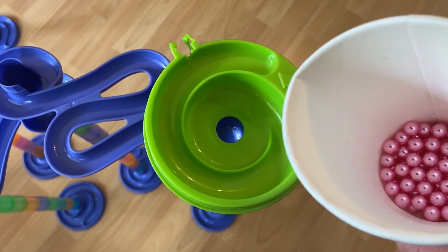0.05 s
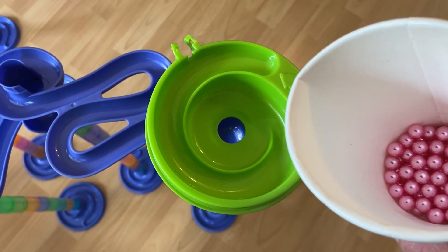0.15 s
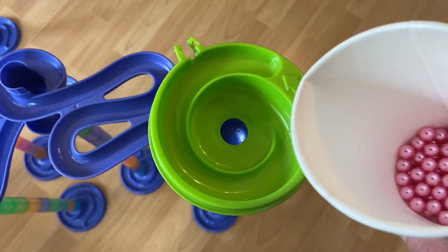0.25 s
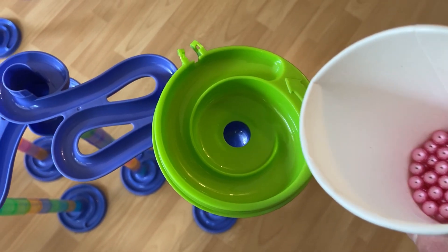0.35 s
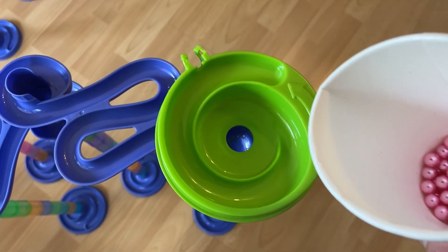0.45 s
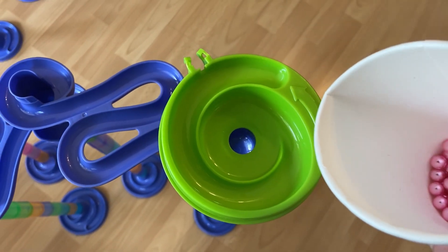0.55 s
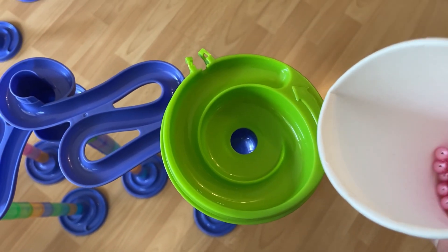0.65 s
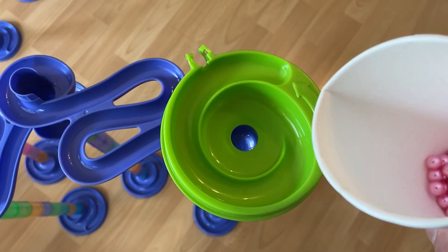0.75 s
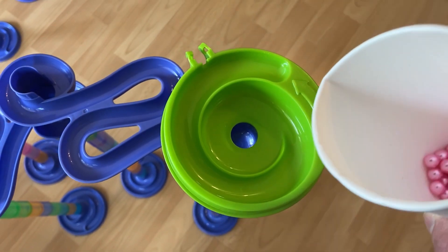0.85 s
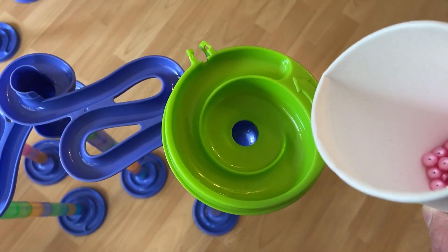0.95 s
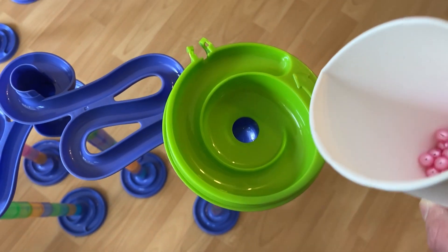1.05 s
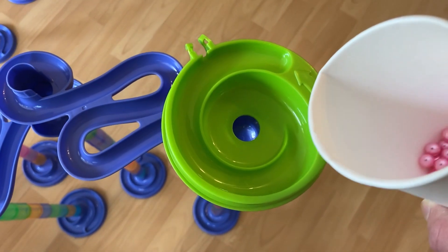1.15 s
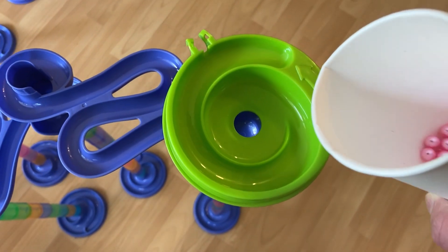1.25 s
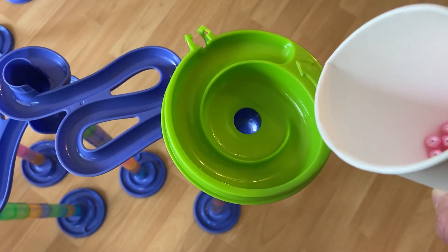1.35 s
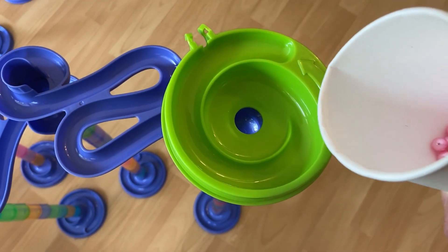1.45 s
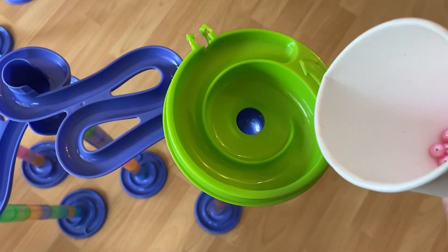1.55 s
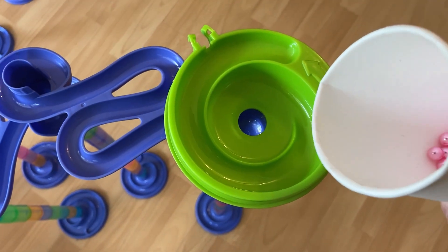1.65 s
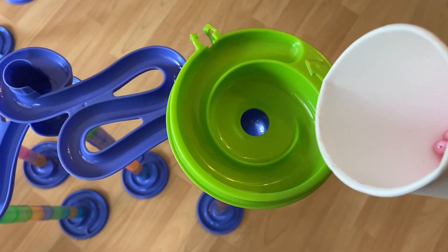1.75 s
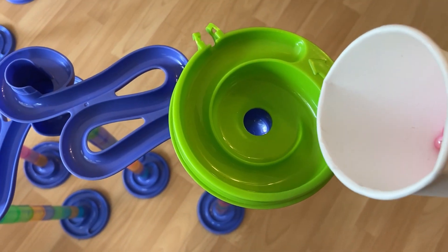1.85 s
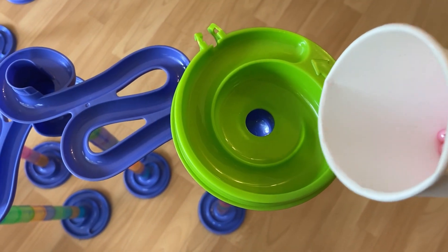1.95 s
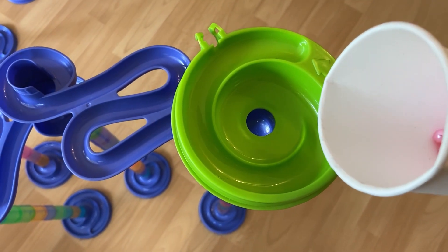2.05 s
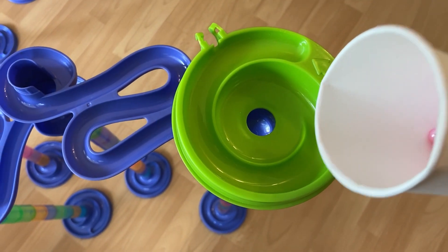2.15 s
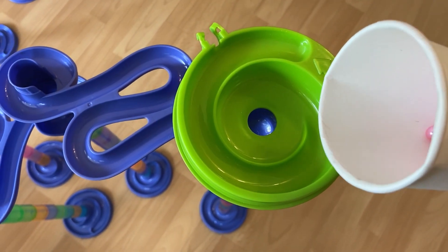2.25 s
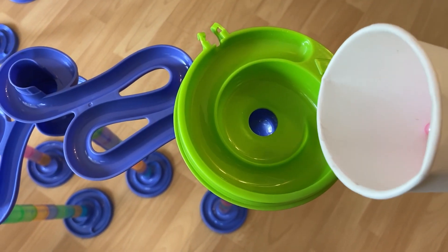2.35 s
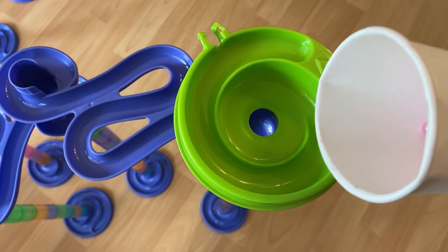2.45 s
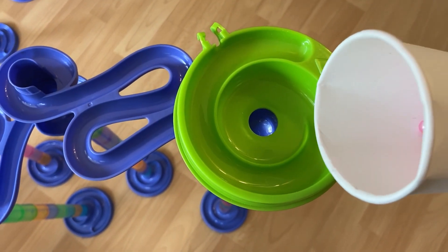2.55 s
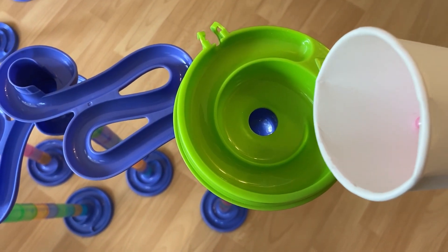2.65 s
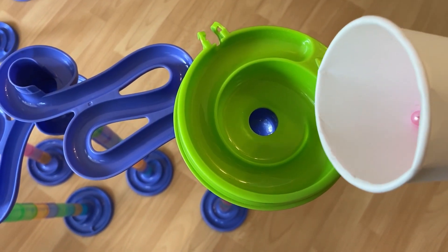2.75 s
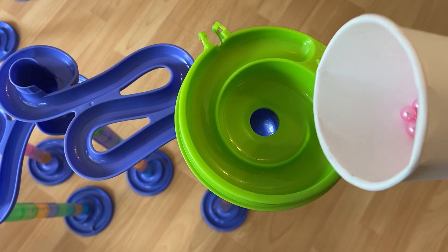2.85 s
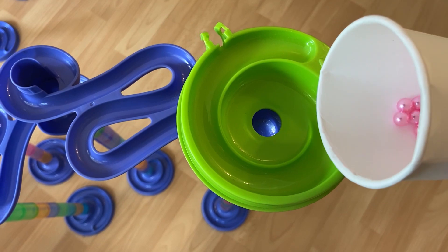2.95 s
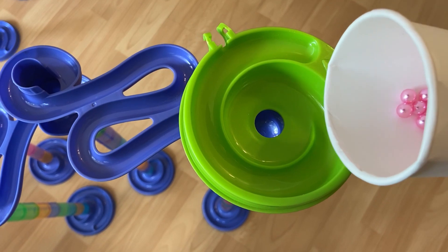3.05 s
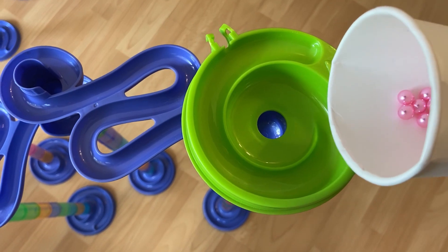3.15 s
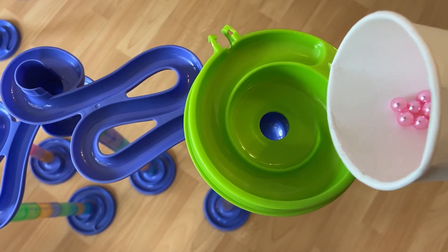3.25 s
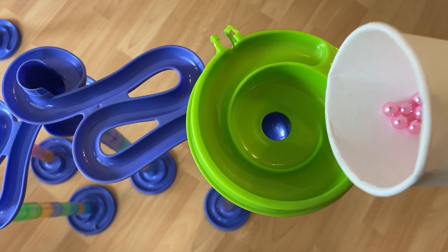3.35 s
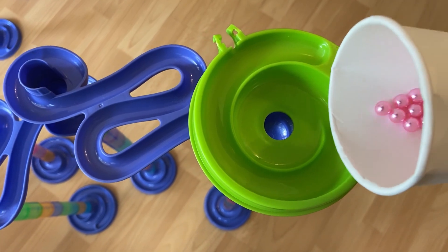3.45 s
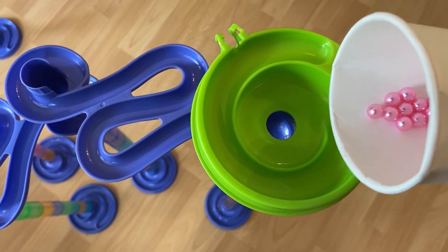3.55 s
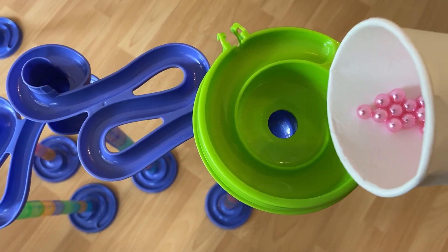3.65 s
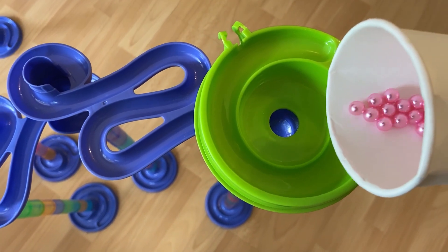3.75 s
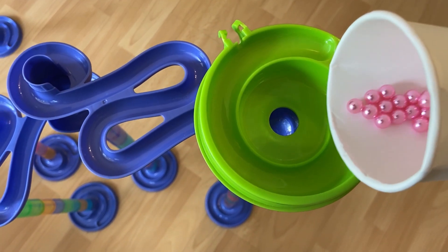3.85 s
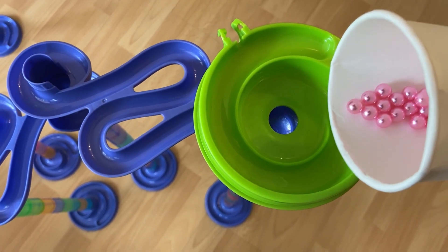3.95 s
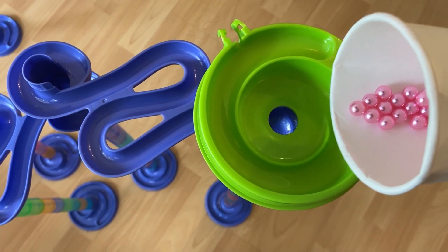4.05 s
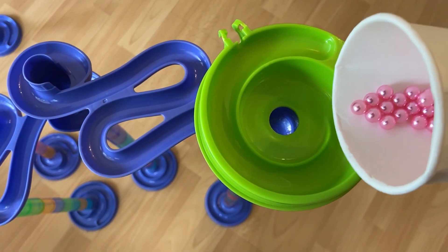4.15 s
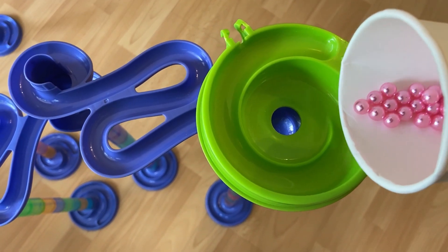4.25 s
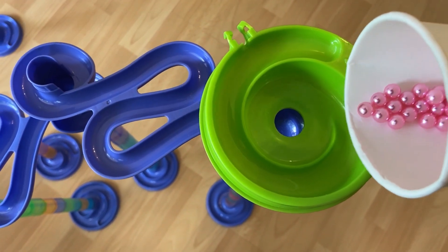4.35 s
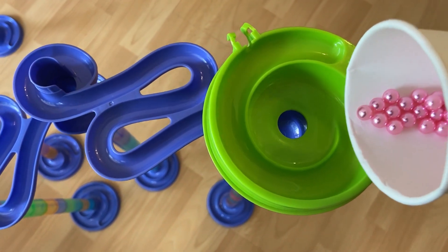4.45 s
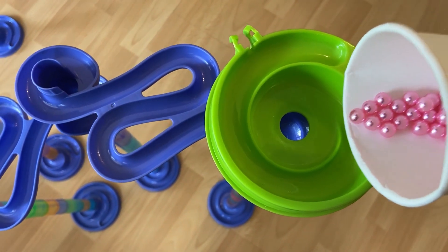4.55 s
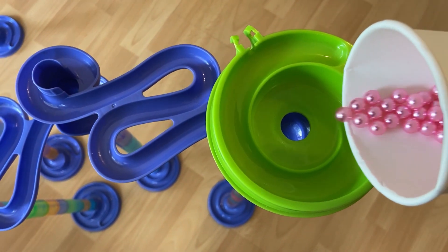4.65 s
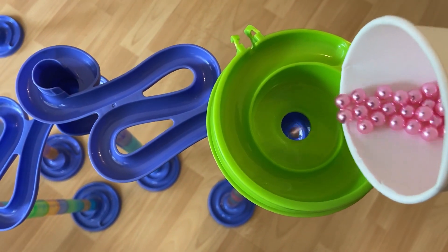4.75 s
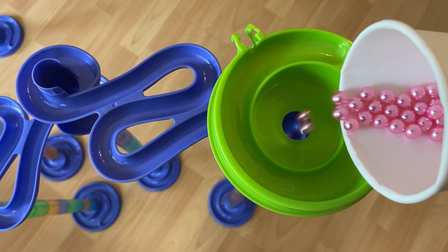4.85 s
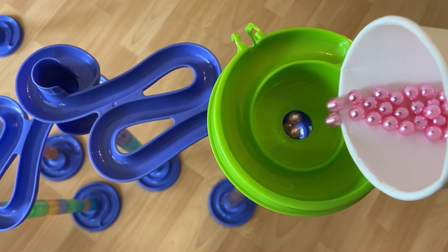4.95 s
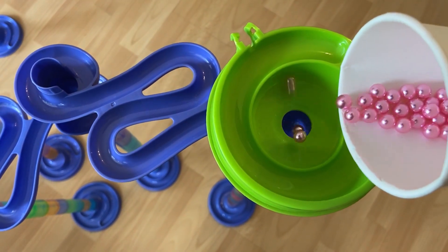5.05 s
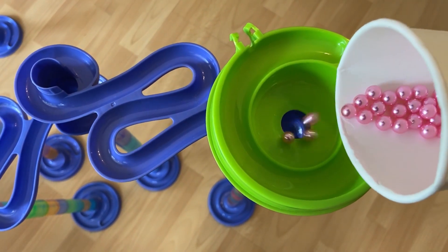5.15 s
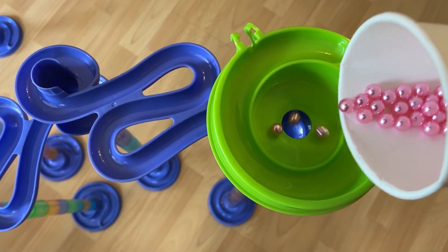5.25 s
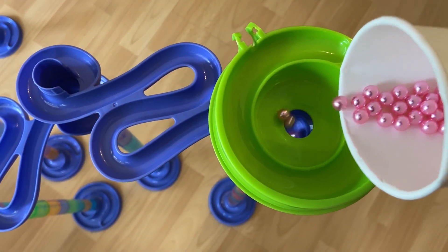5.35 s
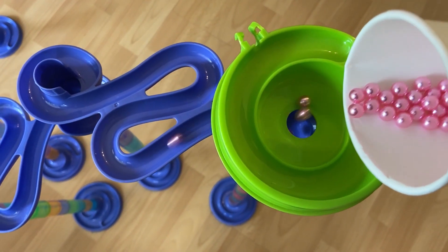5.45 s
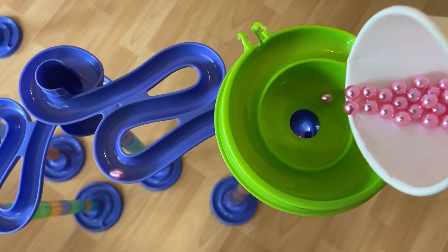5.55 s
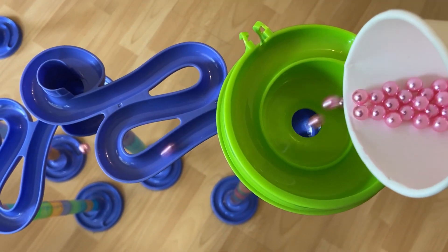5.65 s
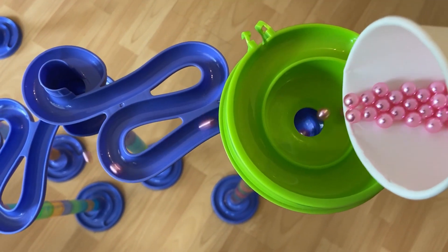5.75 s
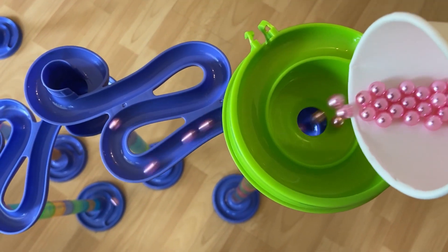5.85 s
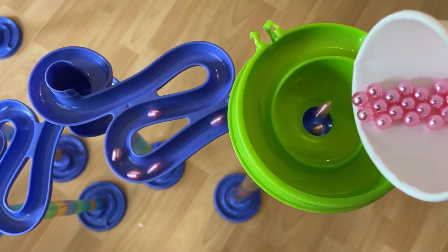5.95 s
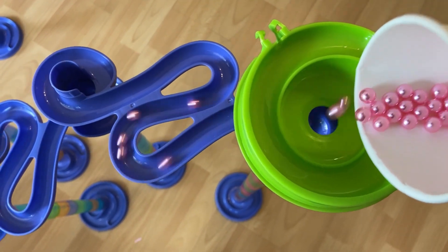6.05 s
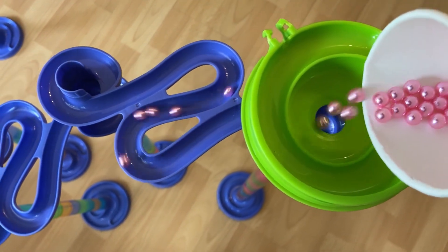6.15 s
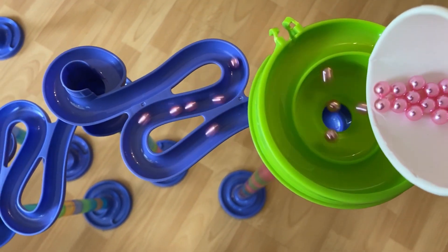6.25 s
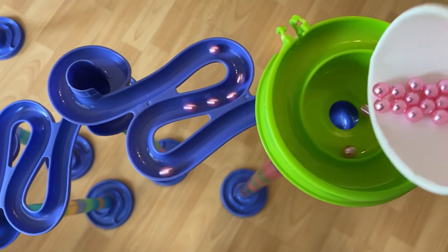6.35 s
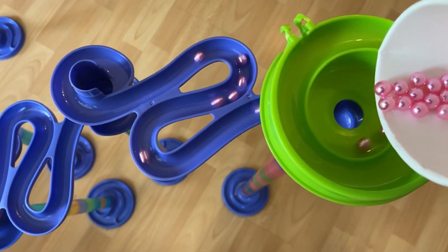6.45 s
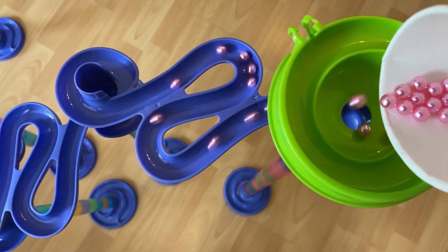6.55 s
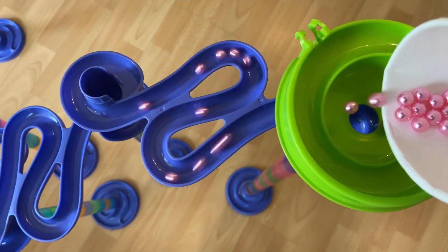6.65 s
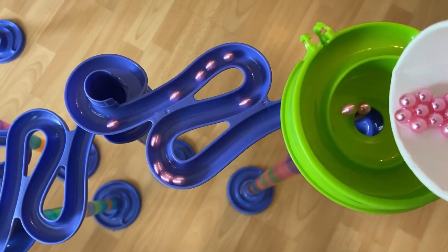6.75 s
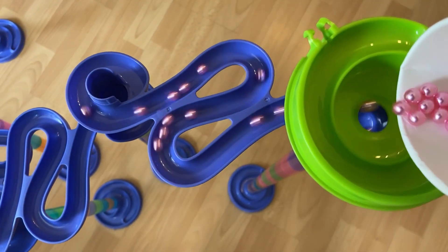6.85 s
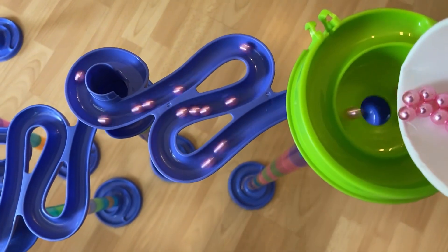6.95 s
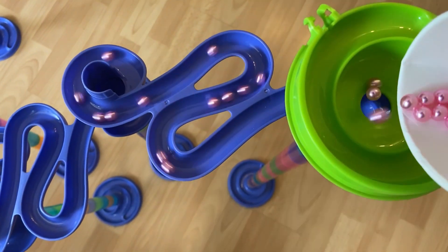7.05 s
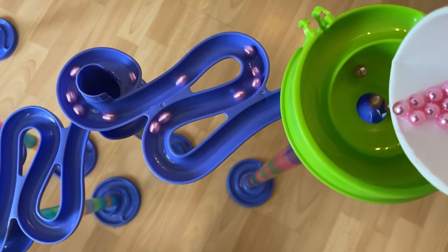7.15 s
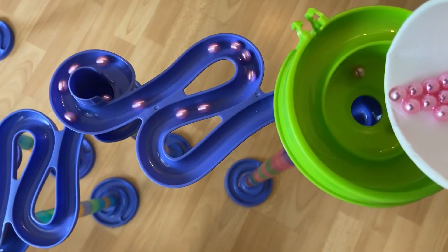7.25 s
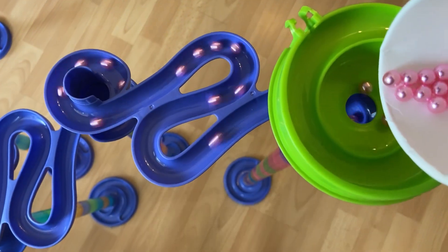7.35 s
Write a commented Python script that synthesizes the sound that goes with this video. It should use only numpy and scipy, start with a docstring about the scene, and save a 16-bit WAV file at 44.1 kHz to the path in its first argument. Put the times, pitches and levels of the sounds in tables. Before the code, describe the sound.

Close up, a heap of light plastic beads slides inside a tilting paper cup, clicking together and drumming softly on its thin wall in uneven bursts. After about five seconds they spill into a plastic funnel, bouncing with bright ticks, then roll down hollow tracks in a louder, continuous clatter. The cup rim bumps the funnel a few times. Quiet small room, close stereo microphone.

```python
"""Plastic beads in a paper cup and on a marble run

Light beads shuffle in a tilted paper cup close to a stereo microphone and knock its thin, modal wall.
From 4.9 s they drop into the plastic funnel of a marble run, bounce and rattle down its tracks.
Contacts are impulses with scattered, coloured shell noise; the cup's rim bumps the funnel three times.
Diffuse noise tails answer as a small room, over faint room noise and a brief rumble of handling."""
import sys
import numpy as np
from scipy import signal
from scipy.fft import rfft, irfft, next_fast_len
from scipy.io import wavfile

SR = 44100
rng = np.random.default_rng(int(sys.argv[2]) if len(sys.argv) > 2 else 0)


def materialize(psi):
    """Save the field psi as 16-bit PCM at rate SR to the path in sys.argv[1].

    A 1-D psi becomes a single channel; in a 2-D psi each row is a channel.
    """
    bounded = np.clip(np.atleast_2d(psi).T, -1, 1)
    quanta = np.round(bounded * 32767).astype(np.int16)
    wavfile.write(sys.argv[1], SR, quanta)


N = 325899
HIT_SAMPLES = 4096  # length of one contact
LEVEL_WINDOW_S = 0.005  # a hit of 0 dB has the energy of rms 1 over this time

# Strongest bead knocks in the cup. Each row: time in seconds, bead click in dB, cup wall in dB.
CUP_KNOCKS = [(.3418, -54, -66), (.3809, -58, -71), (.4687, -52.5, -68), (.4939, -45.5, -48),
              (0.6136, -61, -68), (0.6516, -45, -59), (.6673, -27, -36.5), (.7085, -25, -35),
              (.7377, -31, -36), (0.7588, -27.5, -48), (0.768, -27.5, -31.5), (.8182, -25.5, -30.5),
              (.8363, -21, -35), (.8599, -30.5, -28.5), (.8859, -24.5, -40), (.9215, -29.5, -30.5),
              (0.9389, -32, -47), (.9796, -31, -44), (1.014, -32, -34), (1.0876, -29.5, -35),
              (1.0913, -28, -48), (1.101, -30, -31), (1.114, -30, -43), (1.1478, -31, -41),
              (1.1636, -26, -27), (1.1796, -26.5, -51), (1.2658, -30, -39), (1.3147, -30, -29.5),
              (1.3385, -23, -25), (1.3607, -28, -48), (1.3958, -26.5, -26.5), (1.4996, -29.5, -32),
              (1.5161, -28.5, -31), (1.5924, -43, -41), (1.6476, -38, -42.5), (1.8018, -34.5, -53),
              (1.8195, -50, -39), (1.8333, -25, -26), (1.8723, -33.5, -36), (1.953, -33, -36.5),
              (1.9815, -36, -31), (2.0517, -29, -34.5), (2.0861, -26.5, -24.5), (2.164, -44.5, -62),
              (2.3108, -42, -46), (2.3373, -31.5, -38.5), (2.5172, -35, -30), (2.5421, -37.5, -30.5),
              (2.5663, -52, -39), (2.7163, -29.5, -41), (2.7978, -28, -49), (2.8086, -24, -24),
              (2.8217, -28.5, -29), (2.8459, -27, -25.5), (2.9095, -23, -19), (2.9316, -27, -28),
              (2.9764, -29, -48), (3.018, -53, -30.5), (3.0573, -35, -30), (3.0956, -27, -35.5),
              (3.1402, -33, -29.5), (3.1847, -35.5, -33.5), (3.2077, -41, -33), (3.2998, -35, -42),
              (3.4239, -35, -39.5), (3.448, -34, -36.5), (3.5131, -31, -27), (3.6656, -28, -31.5),
              (3.6887, -39, -30), (3.8036, -32.5, -50), (3.8395, -34.5, -34), (3.8808, -26.5, -48),
              (3.8878, -35, -28.5), (3.9086, -37.5, -44), (4.2419, -29.5, -42), (4.2946, -40.5, -46),
              (4.3379, -42.5, -61), (4.4232, -29, -47.5), (4.4624, -39.5, -49.5), (4.6573, -32, -34),
              (4.6646, -33, -25), (4.6899, -28, -31), (4.7057, -49, -29), (4.7184, -32, -35),
              (4.7668, -33, -49), (4.7977, -35, -38.5), (4.8299, -33, -38.5), (4.8774, -27.5, -30),
              (4.899, -29, -30), (4.954, -23.5, -33), (5.663, -52, -34), (5.758, -41, -27),
              (5.865, -28.5, -33), (6.069, -28, -34), (6.735, -48, -33.5)]
# Strongest bounces on the run. Each row: time in seconds, hollow ring, plastic clack, hard tick in dB.
RUN_BOUNCES = [(4.903, -22, -23.5, -20), (4.919, -26, -25, -23), (4.9557, -36, -31, -27),
               (4.9778, -34, -37, -26), (5.015, -22.5, -22, -19), (5.0204, -22, -18.5, -16),
               (5.08, -26, -17.5, -26), (5.1048, -23, -24, -21), (5.113, -24.5, -21, -16.5),
               (5.1275, -44, -23, -31), (5.1474, -22, -20, -16.5), (5.1544, -30, -19.5, -24),
               (5.1698, -53, -27, -26), (5.1867, -26, -21, -19), (5.2274, -28, -27, -29),
               (5.2334, -32, -21, -24), (5.2751, -27.5, -20.5, -23.5), (5.2972, -32, -29, -29),
               (5.3326, -25, -20, -18.5), (5.344, -33, -21.5, -28), (5.3921, -32, -33.5, -36),
               (5.4738, -26.5, -25, -28.5), (5.505, -47, -31.5, -35), (5.5337, -25, -25.5, -21.5),
               (5.544, -28, -29, -42), (5.6107, -23.5, -22.5, -19), (5.6306, -28, -17, -23),
               (5.6468, -42, -24, -27), (5.6644, -32, -29, -23.5), (5.7249, -29, -33, -32.5),
               (5.8072, -28, -14, -22.5), (5.8232, -32, -21, -24), (5.8445, -34, -16, -22),
               (5.8661, -32, -19.5, -22), (5.9729, -42, -21, -25), (6.0077, -48, -23.5, -31.5),
               (6.0583, -30, -14.5, -21.5), (6.0701, -27, -27, -20), (6.088, -32, -23.5, -27.5),
               (6.1356, -27, -20.5, -17.5), (6.156, -38, -22.5, -34), (6.1742, -36, -26, -29),
               (6.2239, -32, -16, -23.5), (6.333, -26, -16.5, -21), (6.346, -35, -18, -22),
               (6.3879, -32.5, -37, -28), (6.4079, -38, -15.5, -31), (6.4215, -25, -24, -31),
               (6.428, -46, -25.5, -28), (6.4534, -30, -24.5, -31), (6.4688, -25, -26.5, -33),
               (6.477, -31.5, -29, -33), (6.5094, -40, -25.5, -38), (6.5143, -36, -25.5, -32),
               (6.529, -30.5, -23, -31.5), (6.568, -30.5, -29, -37), (6.592, -28, -34.5, -54),
               (6.6935, -23.5, -18.5, -23), (6.74, -31, -30, -24), (6.75, -46, -27, -18.5),
               (6.8003, -36, -19, -23.5), (6.825, -20.5, -19.5, -22), (6.8685, -32, -27, -30),
               (6.9086, -33, -31, -42), (6.9244, -39, -26, -29), (6.9439, -34, -20.5, -27),
               (6.9671, -35, -28, -20), (7.021, -32, -24.5, -26.5), (7.0567, -20.5, -18.5, -20.5),
               (7.0779, -32, -17, -32), (7.1042, -37, -26, -35), (7.1676, -48, -28.5, -32),
               (7.1977, -24, -30, -39), (7.2276, -29, -28, -18), (7.2464, -29.5, -22.5, -30),
               (7.2618, -33, -38, -20.5), (7.3038, -33, -24.5, -21), (7.3478, -30.5, -35, -23.5)]
# Share of the heap that lies on the cup's side wall. Each row: time in seconds, share from 0 to 1.
HEAP_ON_SIDE = [(2.5, 0.18), (2.85, 0.53), (3.7, 0.56), (4.65, 0.62)]
# Colour of a bead click in the cup. Each row: frequency in Hz, relative level in dB per Hz.
CLICK_COLOUR = [(100, -38), (400, -24.5), (1000, -11), (1750, -8.5), (2160, 10.5), (2700, -6.5), (3700, -4),
                (5000, -11), (7000, -5), (9000, -16), (12500, -12.5), (16000, -37)]
# Colour of a tiny hard tick. Each row: frequency in Hz, relative level in dB per Hz.
TICK_COLOUR = [(1000, -50), (5200, -12), (7000, 5.5), (8200, 6.5), (9200, 5.5), (10700, -0.5), (12500, 2.5),
               (14000, -1.5), (16000, -22)]


def amp(db):
    """Decibels to gain."""
    return 10 ** (np.asarray(db) / 20)


def unit(x):
    """Scaled to rms 1."""
    return x / np.sqrt(np.mean(x ** 2) + 1e-20)


def along(points, hz):
    """Value at hz, interpolated between (Hz, value) points on a log axis."""
    f, v = np.transpose(points)
    return np.interp(np.log(hz + 1), np.log(f + 1), v)


def curve(rows, seconds):
    """(Seconds, value) rows interpolated at the given times."""
    return np.interp(seconds, *np.transpose(rows))


def filtered(x, response):
    """x times a response of frequency."""
    size = next_fast_len(N + SR // 2)
    return irfft(rfft(x, size) * response(np.fft.rfftfreq(size, 1 / SR)), size)[..., :N]


def causal(gain_db):
    """Minimum-phase responses with the given gains: they ring only after the blow."""
    cepstrum = irfft(np.log(amp(gain_db)))
    cepstrum[..., 1:HIT_SAMPLES // 2] *= 2
    cepstrum[..., HIT_SAMPLES // 2 + 1:] = 0
    return np.exp(rfft(cepstrum))


def bursts(count, colour, t60, scatter, lag_ms, vary_db, travel_ms=0, apart=1.0):
    """Stereo contacts: a sharp impulse, then vibration scattered through the shell, each coloured anew."""
    t = np.arange(HIT_SAMPLES) / SR
    hz = np.fft.rfftfreq(HIT_SAMPLES, 1 / SR)
    fade = amp(-60 * t / t60) * (1 - np.exp(-t / 0.00079))
    # one noise common to both ports, plus one of its own for each
    noise = rng.standard_normal((count, 3, HIT_SAMPLES))
    shell = (noise[:, :1] + apart * noise[:, 1:]) * fade / np.linalg.norm(fade)
    scattered = 1 + scatter * rfft(shell * np.linspace(1, 0, HIT_SAMPLES))
    # each struck spot has its own uneven colour
    spots = np.geomspace(300, 16000, 24)
    ripple = np.array([np.interp(hz, spots, row) for row in rng.standard_normal((count, len(spots)))])
    body = causal(along(colour, hz) + vary_db * ripple)[:, None]
    # the left port lags the right one by lag_ms; a negative value delays the right port
    delay = np.maximum(np.reshape(lag_ms, (-1, 1, 1)) * np.array([[1], [-1]]), 0) / 1000
    # bending waves are slower at low pitch, so the treble arrives first
    bending = travel_ms * (2 * np.sqrt(hz / 1000) - hz / np.sqrt(1000 * SR / 2))
    return irfft(scattered * body * np.exp(-2j * np.pi * (hz * delay + bending)))


def place(times, levels_db, sounds):
    """Lay each stereo sound at its time and level."""
    out = np.zeros((2, N + 2 * HIT_SAMPLES))
    window_gain = np.sqrt(LEVEL_WINDOW_S * SR / HIT_SAMPLES)
    for seconds, db, sound in zip(times, levels_db, sounds):
        start = max(round(seconds * SR), 0)
        out[:, start:start + HIT_SAMPLES] += amp(db) * unit(sound) * window_gain
    return out[:, :N]


def patter(rate, spread_db, sounds):
    """Many small contacts of uneven size, rate a second, each playing one of the given sounds; rms 1."""
    out = np.zeros((2, N))
    for sound in sounds:
        at = rng.integers(0, N, int(rate * N / SR / len(sounds)))
        sizes = amp(spread_db * np.minimum(rng.standard_normal(len(at)), 2))
        contacts = np.bincount(at, sizes, N)[None]
        out += signal.oaconvolve(contacts, unit(sound), axes=1)[:, :N]
    return unit(out)


def chance_times(start, end, rate):
    """Unevenly spaced moments, rate a second."""
    count = int((end - start) * rate)
    return start + (np.arange(count) + rng.random(count)) / rate


def swell(start, length, attack, t60, sag_db_per_s=0):
    """Gain that rises, holds while sagging, and dies away."""
    t = np.arange(N) / SR - start
    sag_db = sag_db_per_s * np.clip(t, 0, length)
    decay_db = 60 * np.maximum(t - length, 0) / t60
    return np.clip(t / attack, 0, 1) * amp(-sag_db - decay_db)


def aftermath(times, levels_db, t60):
    """Power of the motion that blows leave behind; it adds up and dies away."""
    kicks = np.bincount(np.round(times * SR).astype(int), amp(levels_db) ** 2, N)[:N]
    return signal.lfilter([1], [1, -amp(-60 / (t60 * SR)) ** 2], kicks)


def background():
    """Faint room noise, and a brief low rumble of handling: both are filtered noise."""
    # Colour of the quiet room. Each row: frequency in Hz, relative level in dB per Hz.
    air_colour = [(15, -41), (25, -22), (66, -14.5), (163, -17.5), (286, -12.5), (335, -14), (709, -27),
                  (15000, -45)]
    rumble_colour = [(20, -15), (55, -2), (140, -27), (900, -76)]
    air = unit(filtered(rng.standard_normal((2, N)), lambda hz: amp(along(air_colour, hz))))
    rumble = unit(filtered(rng.standard_normal((2, N)), lambda hz: amp(along(rumble_colour, hz))))
    rumble_db = curve([(.1, -72), (.5, -92.5)], np.arange(N) / SR)
    return amp(-76.5) * air + amp(rumble_db) * rumble


def room(x, count=4):
    """Diffuse tails of decaying noise; the sound passes from one tail to the next every 40 ms."""
    # Reverberation of the small room. Each row: frequency in Hz, time to fall by 60 dB in seconds.
    decay_times = [(150, 0.54), (1000, 0.57), (5000, 0.21), (14000, 0.21)]
    colour = [(250, 7.5), (800, -2.5), (2000, 1.0), (6000, -1.5), (13000, -4.5)]
    wet = np.zeros((2, N))
    turn = np.arange(N) / SR / .04
    for k in range(count):
        hz, t, z = signal.stft(rng.standard_normal((2, SR * 3 // 4)), SR, nperseg=256)
        fade = amp(-60 * t / along(decay_times, hz)[:, None])
        tail = signal.istft(z * fade, SR, nperseg=256)[1]
        # the tail starts 3 ms after the direct sound
        tail = np.pad(tail / np.linalg.norm(tail[0]), ((0, 0), (round(.003 * SR), 0)))
        share = np.maximum(1 - abs((turn + k) % count - 1), 0)
        wet += signal.fftconvolve(x * share, tail, axes=1)[:, :N]
    return filtered(wet, lambda hz: amp(along(colour, hz)))


def bumps():
    """The rim pushes the whole tower: a low thud with a hollow after-ring; its loose joints buzz briefly."""
    # The cup's rim meets the funnel. Each row: time in seconds, thud in dB, shaken plastic in dB.
    rim_bumps = [(6.138, -27, -16.5), (6.752, -37, -20), (7.26, -44.5, -20.5)]
    # Colour of the thud. Each row: frequency in Hz, relative level in dB per Hz.
    thud_colour = [(80, -34), (180, -21), (250, 0), (400, -2.5), (600, 1), (850, -18), (2000, -62)]
    hollow = [(130, -20), (230, -12), (370, -2), (520, -13), (1200, -49)]
    buzz = [(300, -33), (1500, -15), (3000, -3), (6500, 1), (9000, -10), (12500, -0.5), (16000, -26)]
    s, thud_db, shake_db = np.transpose(rim_bumps)
    thuds = bursts(len(s), thud_colour, t60=0.018, scatter=0.68, lag_ms=0, vary_db=-0.5)
    after_rings = bursts(len(s), hollow, t60=0.46, scatter=4.6, lag_ms=0, vary_db=4.5)
    buzzes = bursts(len(s), buzz, t60=0.13, scatter=6.1, lag_ms=-0.12, vary_db=2.5)
    tower = place(s + 0.002, thud_db, thuds) + place(s + 0.00988, thud_db - 9, after_rings)
    # the thud is a little louder in the right port
    return tower * amp([[-2], [1.5]]) + place(s, shake_db, buzzes)


def rolling():
    """Rolling beads chatter finely on the track walls, more so after a bounce, and skip over the joints."""
    # Beads rolling on funnel and tracks. Each row: time in seconds, level in dB.
    roll_level = [(4.9, -37), (5.15, -34.5), (5.48, -40.5), (5.7, -39), (6.17, -36.5), (6.64, -44),
                  (6.87, -32.5), (7.05, -39.5), (7.39, -35)]
    # Colour of the fine chatter. Each row: frequency in Hz, relative level in dB per Hz.
    track_colour = [(50, -29), (120, -15), (220, -22), (480, -17), (720, -0.5), (1100, -3), (1500, 5.5),
                    (2500, -7.5), (4000, -1.5), (6800, 3.5), (9000, -7.5), (12500, -16.5), (16000, -38)]
    # Colour of a light skip on the track. Each row: frequency in Hz, relative level in dB per Hz.
    skip_colour = [(200, -28), (900, -19), (1500, 2), (2500, 3.5), (4000, 0), (7000, 4.5), (9000, -6.5),
                   (13000, -14.5), (16000, -28)]
    start_s, attack_s = 4.9, .05  # the first bead lands
    skid_db, skid_t60 = -15.5, 0.1  # chatter after a bounce, relative to its clack; decay in s
    skips_per_s, skip_db, skip_spread_db = 35, 3, 3  # lesser bounces, relative to the rolling
    lead_s, lead_db = .0033, -20  # mean lead of the faint tick; its level relative to the clack
    s, _, clack_db, _ = np.transpose(RUN_BOUNCES)
    t = np.arange(N) / SR
    steady = amp(curve(roll_level, t)) * np.clip((t - start_s) / attack_s, 0, 1)
    motion = np.sqrt(steady ** 2 + aftermath(s, clack_db + skid_db, skid_t60))
    taps = bursts(24, track_colour, t60=0.011, scatter=1.6, lag_ms=0, vary_db=4.5,
                  travel_ms=2.181, apart=2.1)
    chatter = patter(rate=480, spread_db=4.0, sounds=taps)
    at = chance_times(start_s + attack_s, N / SR, skips_per_s)
    skips = bursts(len(at), skip_colour, t60=0.0051, scatter=0.4, lag_ms=-0.077, vary_db=2.5,
                   travel_ms=1.8)
    skipping = place(at, skip_db + skip_spread_db * rng.standard_normal(len(at)), skips)
    # a faint soft tick leads into each bounce
    lead_at = s - lead_s * rng.uniform(.6, 1.4, len(s))
    lead_ticks = place(lead_at, clack_db + lead_db, rng.choice(skips, len(s)))
    return motion * (chatter + skipping) + lead_ticks


def bounces():
    """Beads bounce with bright ticks in the funnel, duller clacks on the tracks; the hollow plastic rings."""
    # Colour of the hollow ring. Each row: frequency in Hz, relative level in dB per Hz.
    ring_colour = [(150, -54), (700, -20), (1150, -7.5), (1480, 6.5), (1800, 1), (2050, -0.5), (2600, -2),
                   (5000, -21.5)]
    # Colour of the plastic clack. Each row: frequency in Hz, relative level in dB per Hz.
    clack_colour = [(300, -87), (1800, -34.5), (2700, -9.5), (3400, -7.5), (3950, 2), (4700, -3.5),
                    (5450, -3), (6600, -12.5), (9000, -38.5)]
    s, ring_db, clack_db, tick_db = np.transpose(RUN_BOUNCES)
    # the funnel reaches the left port first; the tracks reach the right one first
    in_funnel = tick_db > clack_db - 3
    lag_ms = np.where(in_funnel, -.16, rng.uniform(0, 0.48, len(s)))
    rings = bursts(len(s), ring_colour, t60=0.016, scatter=1.15, lag_ms=lag_ms, vary_db=-0.5,
                   travel_ms=2.107)
    clacks = bursts(len(s), clack_colour, t60=.006, scatter=0.85, lag_ms=lag_ms, vary_db=-2.5,
                    travel_ms=2.2)
    ticks = bursts(len(s), TICK_COLOUR, t60=.006, scatter=1.0, lag_ms=lag_ms, vary_db=2.5,
                   travel_ms=1.358)
    ring = place(s - .0005, ring_db, rings) * amp([[1], [-1.3]])
    clack = place(s - .0004, clack_db, clacks) * amp([[-1], [.8]])
    return ring + clack + place(s - .0002, tick_db, ticks)


CREEP_FROM_S, CREEP_TO_S = .64, 4.95  # the heap never lies quite still while the cup is tilted
SIDE_DRUM_DB = 9.5  # lying on the side wall, beads drum more and click less


def heap_motion():
    """Level of the heap's rustle in dB: creep, slides, a short noise swell into each knock, a stir after."""
    # The heap gives way. Each row: start in seconds, length in seconds, rustle in dB before it slackens.
    slides = [(0.68, 0.26, -38.5), (1.09, 0.31, -42), (1.787, 0.26, -48), (2.748, .2, -32.5),
              (2.945, 0.29, -39), (3.618, 0.21, -49.5), (4.616, 0.31, -42)]
    attack_s, sag_db_per_s, slide_t60 = 0.056, 16.5, 0.35  # gathers speed, slackens, comes to rest
    creep_db = -62
    lead_db, lead_t60 = -22, .1  # swell before a knock, relative to its click
    stir_db, stir_t60 = -18.5, 0.45  # left behind by a knock, relative to its blow on the wall
    s, click_db, wall_db = np.transpose(CUP_KNOCKS)
    # run backwards in time, so that the swell grows towards the knock
    lead_in = aftermath(N / SR - s, click_db + lead_db, lead_t60)[::-1]
    power = lead_in + aftermath(s, wall_db + stir_db, stir_t60)
    creep = swell(CREEP_FROM_S, CREEP_TO_S - CREEP_FROM_S, attack_s, slide_t60)
    power += (amp(creep_db) * creep) ** 2
    for start, length, db in slides:
        power += (amp(db) * swell(start, length, attack_s, slide_t60, sag_db_per_s)) ** 2
    return 10 * np.log10(power + 1e-12)


def rustle(motion_db):
    """Dense small nudges between beads of the moving heap, leaning to one port by pitch."""
    # Colour of a nudge. Each row: frequency in Hz, relative level in dB per Hz.
    nudge_colour = [(100, -25.5), (420, -23.5), (600, -9.5), (790, 6), (1000, 0.5), (1450, -9.5), (2150, 5),
                    (2800, -7.5), (4700, -9), (8000, -19), (12500, -32), (16000, -44)]
    lean = [(300, 2.5), (720, -13.5), (1200, 5.0), (2300, 1.5), (4500, -3.0)]  # Hz, left over right dB
    nudges = bursts(16, nudge_colour, t60=0.011, scatter=1.12, lag_ms=0.072, vary_db=0.5, travel_ms=1.087)
    heap = amp(motion_db) * patter(rate=650, spread_db=5.0, sounds=nudges)
    return filtered(heap, lambda hz: amp(np.outer([.5, -.5], along(lean, hz))))


def bead_touches(motion_db):
    """Hard beads touching only each other tick brightly; the ticks grow faster than the rustle."""
    touches = bursts(12, TICK_COLOUR, t60=0.0062, scatter=1, lag_ms=0.044, vary_db=9.5)
    drum_db = SIDE_DRUM_DB * curve(HEAP_ON_SIDE, np.arange(N) / SR)
    level_db = 1.33 * motion_db + 10 - drum_db
    return amp(level_db) * patter(rate=90, spread_db=8.5, sounds=touches)


def cup_wall(times, detune=.012, vary_db=2):
    """The cup's modes for each knock; the struck spot moves from bottom to side as it tilts."""
    # Modes of the paper cup. Each row: frequency in Hz, time to fall by 60 dB in seconds,
    # level in dB when struck on the bottom, level in dB when struck on the side, left over right in dB.
    wall_modes = [(617.5, 0.034, -30, -3, -15), (731, 0.033, -4.5, 1.5, -16), (817, 0.035, 3.5, -14, -13.5),
                  (1007.5, 0.035, -47, 6, -7), (1245, 0.026, -10.5, 1, 5)]
    t = np.arange(HIT_SAMPLES) / SR
    hz, t60, bottom_db, side_db, pan_db = np.transpose(wall_modes)
    ports = amp(np.outer([.5, -.5], pan_db))
    signs = (-1) ** np.arange(len(hz))
    tilts = np.clip(curve(HEAP_ON_SIDE, times), 0, 1)
    for tilt, (pitch, size) in zip(tilts, rng.standard_normal((len(times), 2, len(hz)))):
        struck = (1 - tilt) * amp(bottom_db) + tilt * amp(side_db)
        gains = struck * amp(vary_db * size) * signs
        waves = np.sin(2 * np.pi * np.outer(hz * (1 + detune * pitch), t))
        modes = waves * amp(-60 * t / t60[:, None])
        yield (ports * gains) @ modes * (1 - np.exp(-t / .0004))


def strong_clicks():
    """A struck bead clicks, passes the blow to a neighbour, then hops once and lands again."""
    rebound_s, rebound_db = 0.024, -18  # typical hop; landing relative to the click
    s, click_db, _ = np.transpose(CUP_KNOCKS)
    first = bursts(len(s), CLICK_COLOUR, t60=0.016, scatter=0.63, lag_ms=0.061, vary_db=3.5, travel_ms=1.09)
    relays = bursts(len(s), CLICK_COLOUR, t60=0.0043, scatter=0.48, lag_ms=0.073, vary_db=3)
    relay_at = s + rng.uniform(0.0034, .013, len(s))
    landing_at = s + rebound_s * rng.uniform(.8, 1.25, len(s))
    clicks = place(s - .0003, click_db, first) + place(relay_at, click_db - 8.5, relays)
    return clicks + place(landing_at, click_db + rebound_db, rng.choice(relays, len(s)))


def jostles(motion_db):
    """Lesser knocks at random, as strong as the heap's motion: their clicks and their blows on the wall."""
    rate, level_db, spread_db = 40, 3.5, 2  # per second; level relative to the rustle
    wall_over_click_db = -5.5
    at = chance_times(CREEP_FROM_S, CREEP_TO_S, rate)
    size_db = np.interp(at, np.arange(N) / SR, motion_db) + level_db
    size_db = size_db + spread_db * rng.standard_normal(len(at))
    drum_db = SIDE_DRUM_DB * curve(HEAP_ON_SIDE, at)
    sounds = bursts(len(at), CLICK_COLOUR, t60=0.012, scatter=1, lag_ms=0.06, vary_db=5, travel_ms=1.118)
    clicks = place(at, size_db - drum_db, sounds)
    walls = place(at, size_db + wall_over_click_db + drum_db, cup_wall(at))
    return clicks, walls


def cup():
    """Beads tumble over each other, click, and drum on the paper; the heap rustles between the knocks."""
    # Bead sound from the cup's bottom. Each row: frequency in Hz, gain in dB.
    bottom_colour = [(3700, 0.5), (5000, 7.5), (6800, -1.5), (11000, -2)]
    # Bead sound from its side wall. Each row: frequency in Hz, gain in dB.
    side_colour = [(3700, -1.5), (5500, -2.5), (8000, 4), (11000, 1)]
    s, _, wall_db = np.transpose(CUP_KNOCKS)
    motion_db = heap_motion()
    lesser_clicks, lesser_walls = jostles(motion_db)
    beads = strong_clicks() + lesser_clicks + bead_touches(motion_db) + rustle(motion_db)
    walls = place(s, wall_db, cup_wall(s)) + lesser_walls
    # the beads' colour shifts as the heap moves from the bottom to the side
    tilt = np.clip(curve(HEAP_ON_SIDE, np.arange(N) / SR), 0, 1)
    deep = filtered((1 - tilt) * beads, lambda hz: amp(along(bottom_colour, hz)))
    shallow = filtered(tilt * beads, lambda hz: amp(along(side_colour, hz)))
    return deep + shallow + walls


def scene():
    """The cup is right at the microphone and drier; the marble run stands deeper in the room."""
    low_cut_hz = 102  # small light bodies hardly radiate below this corner
    near = cup()
    far = bounces() + rolling() + bumps()
    beads = near + far + room(amp(-13) * near + amp(-10.0) * far)
    return filtered(beads, lambda hz: (1j * hz / (low_cut_hz + 1j * hz)) ** 2) + background()


def record(dry):
    """Stereo width differs by band, widest near 9 kHz; peaks are rounded and the top is cut off."""
    # Stereo width by band. Each row: frequency in Hz, side over mid in dB.
    band_width = [(900, -1), (1400, 2), (2300, 0), (3200, -11), (4500, 0), (7000, -6.5), (9100, 14.5),
                  (10500, -5.5), (13000, -2)]
    top_hz = 16300

    def angle(hz):
        return np.arctan(amp(along(band_width, hz)))

    mid = filtered(dry[0] + dry[1], lambda hz: np.cos(angle(hz)) / np.sqrt(2))
    side = filtered(dry[0] - dry[1], lambda hz: np.sin(angle(hz)) / np.sqrt(2))
    pair = np.array([mid + side, mid - side])
    # the sharpest peaks are rounded off just under full scale
    rounded = pair / (1 + np.abs(pair / .93) ** 8) ** (1 / 8)
    return filtered(rounded, lambda hz: hz < top_hz)


dry = scene()
out = record(dry)
materialize(out)
```